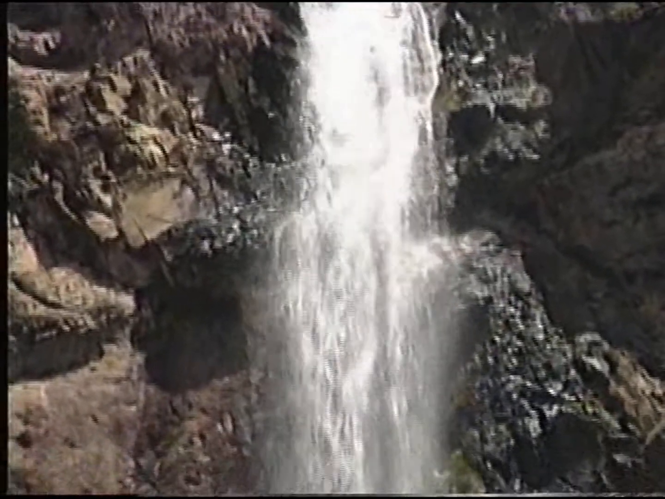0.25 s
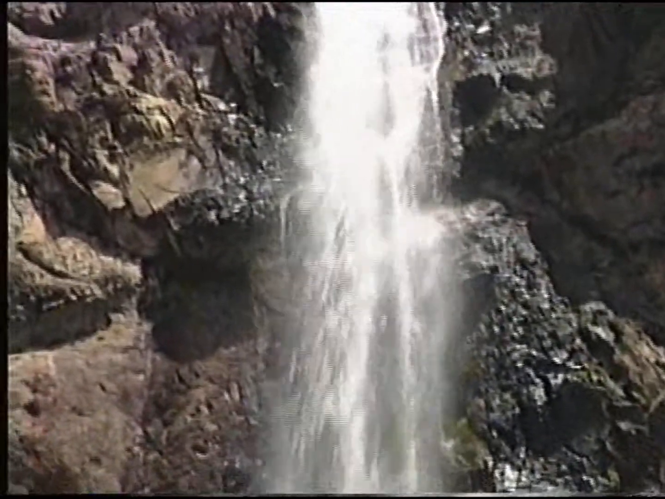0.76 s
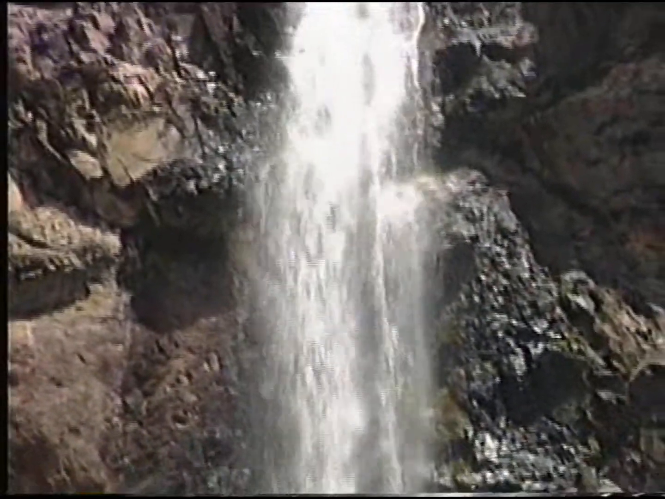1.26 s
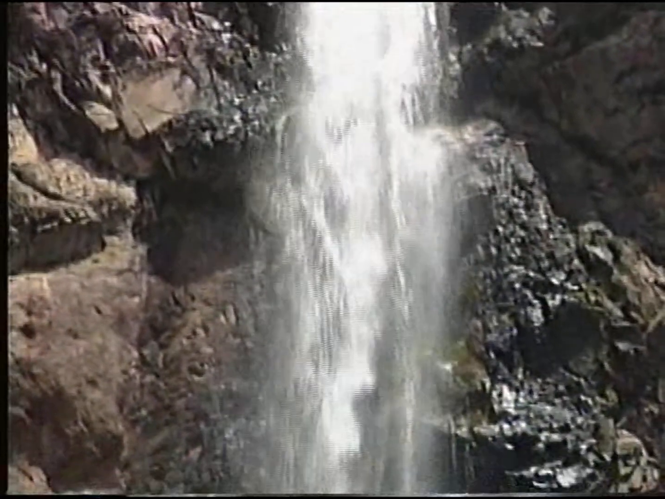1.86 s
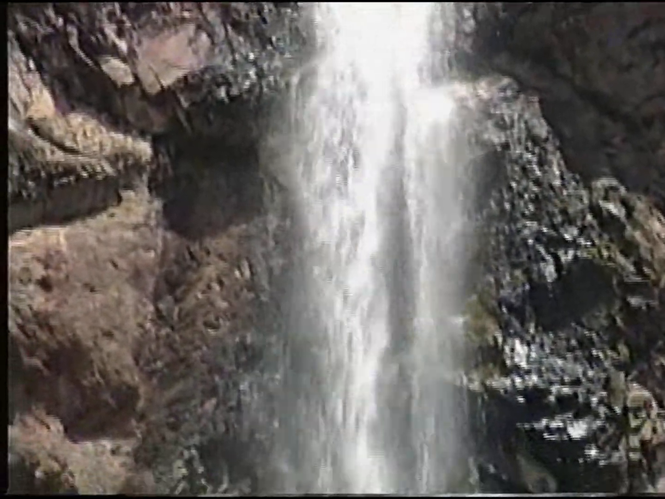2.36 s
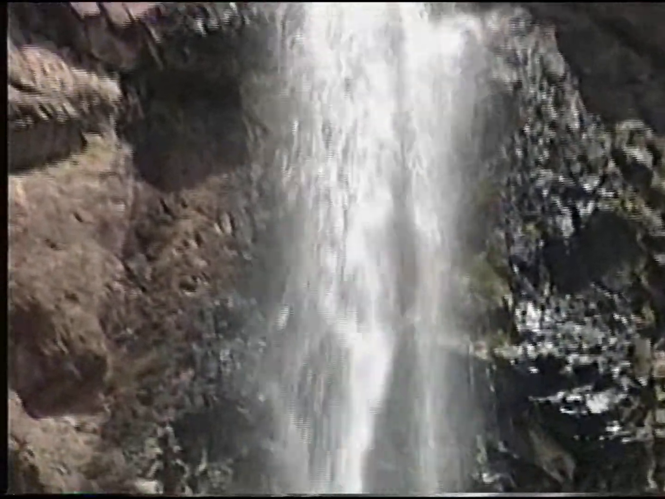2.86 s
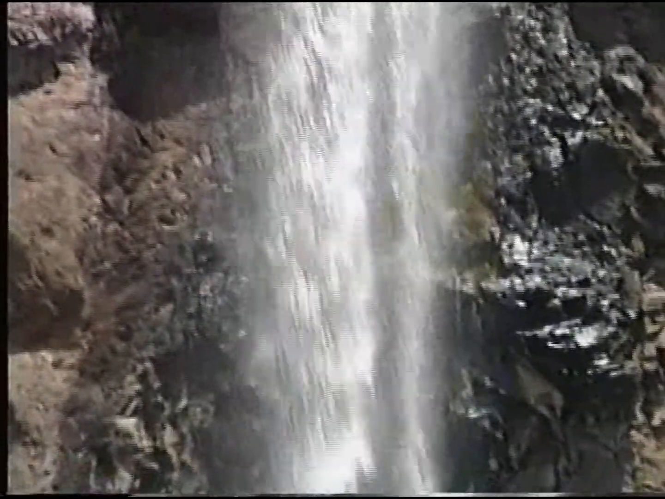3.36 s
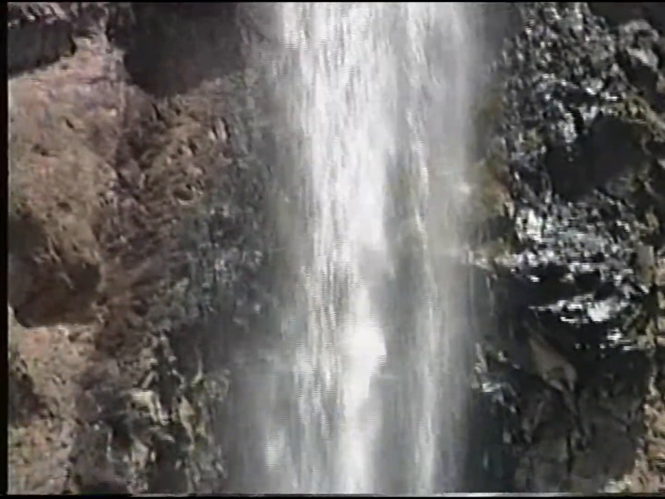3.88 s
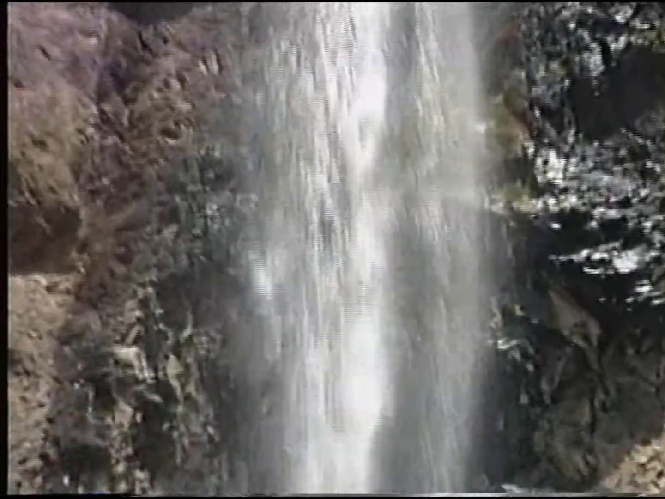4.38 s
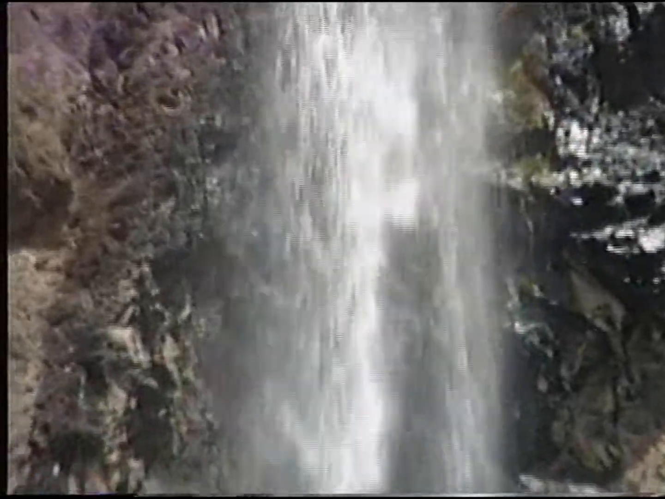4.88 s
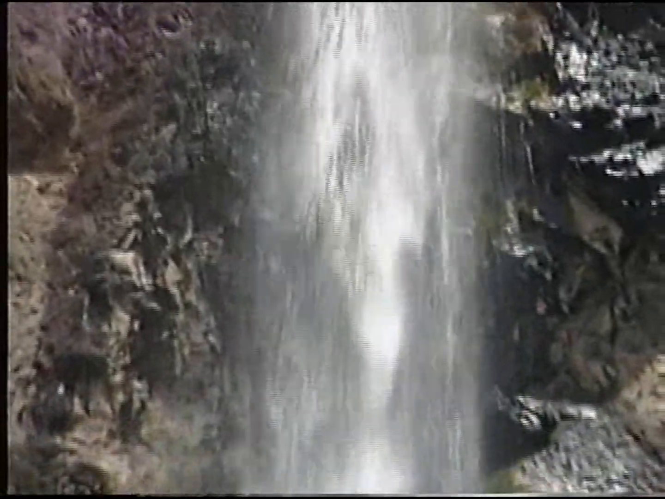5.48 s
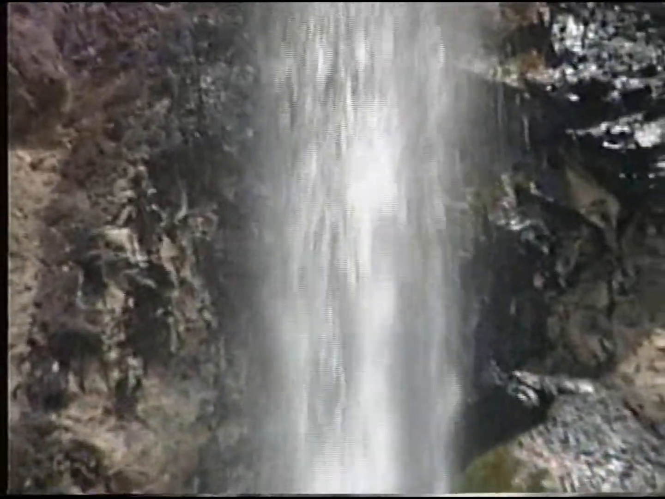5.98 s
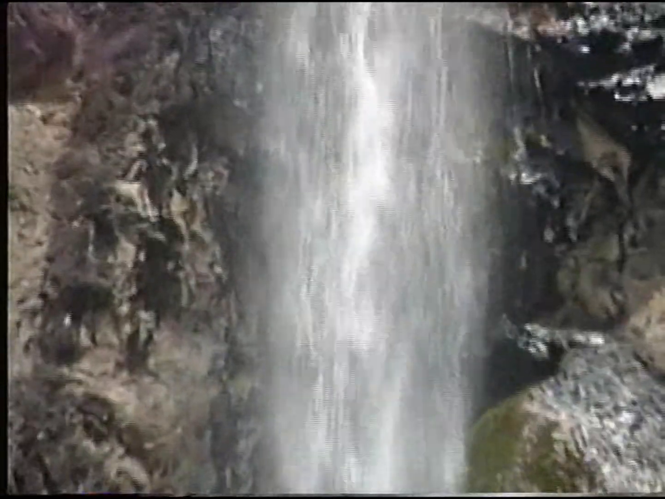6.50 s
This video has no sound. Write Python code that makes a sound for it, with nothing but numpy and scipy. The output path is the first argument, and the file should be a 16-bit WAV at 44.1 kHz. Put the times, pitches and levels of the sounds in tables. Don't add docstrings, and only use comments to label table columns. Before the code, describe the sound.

Continuous waterfall noise outdoors by a mountain rock face: full, churning roar in the low mids, sizzling droplets on stone above it, a little hollow in between. The level stays even from start to finish, with only tiny shifting patches. Mono camcorder sound, slightly grainy and buzzing on top, with a barely audible motor hum and high whine.

```python
import sys
import numpy as np
from scipy import signal
from scipy.fft import rfft, irfft, next_fast_len
from scipy.io import wavfile
from scipy.ndimage import uniform_filter1d, map_coordinates

SR = 44100
rng = np.random.default_rng(int(sys.argv[2]) if len(sys.argv) > 2 else 0)


def to_wav(sig):
    pcm = np.clip(np.atleast_2d(sig), -1, 1) * 32767
    pcm = np.round(pcm).astype(np.int16)
    wavfile.write(sys.argv[1], SR, pcm.T)


def level_to_linear(level):
    exponent = np.asarray(level, float) / 20
    return 10 ** exponent


N = 297234
TIME = np.arange(N) / SR


def unit(x):
    return x / np.sqrt(np.mean(x ** 2) + 1e-20)


def wobble(rate):
    knots = rng.standard_normal(int(N * rate / SR) + 4)
    return map_coordinates(knots, [TIME * rate])


def filtered(x, response):
    size = next_fast_len(N + 8192)
    hz = np.fft.rfftfreq(size, 1 / SR)
    return irfft(rfft(x, size) * response(hz), size)[:N]


def coloured(x, spectrum):
    points_hz, points_db = np.transpose(spectrum)

    def gain(hz):
        return level_to_linear(np.interp(np.log(hz + 1), np.log(points_hz + 1), points_db))

    return unit(filtered(x, gain))


def patchy(patchy_db):
    hiss = signal.stft(rng.standard_normal(N), nperseg=512)[2]
    patches = uniform_filter1d(rng.standard_normal(hiss.shape), size=8, axis=0)
    patches = uniform_filter1d(patches, size=12, axis=1)
    hiss = hiss * level_to_linear(patchy_db * unit(patches))
    return unit(signal.istft(hiss, nperseg=512)[1][:N])


def droplets(spread_db):
    sizes = level_to_linear(spread_db * rng.standard_normal(N))
    return unit(rng.standard_normal(N) * sizes)


def rumble():
    # frequency in Hz, level in dB per Hz.
    rumble_colour = [(2, -3), (15, 7), (35, 1), (60, 0), (120, -33)]
    return level_to_linear(-53.0) * coloured(rng.standard_normal(N), rumble_colour)


def spray():
    # frequency in Hz, level in dB per Hz.
    spray_colour = [(940, -13), (1600, -7.5), (1850, -2), (2200, -0.5), (5300, -5), (6800, -5.5),
                    (8500, -9), (10200, -14), (12000, -22), (13500, -30), (14500, -36), (15400, -48),
                    (16500, -70)]
    hail = unit(patchy(patchy_db=0.27) + level_to_linear(-5.0) * droplets(spread_db=4))
    return level_to_linear(-21) * coloured(hail, spray_colour)


def plunge():
    # frequency in Hz, level in dB per Hz.
    roar_colour = [(35, -45), (60, -25), (120, -9.5), (190, -2.5), (300, 0.5), (520, -3), (800, -4),
                   (1050, -6.5), (1300, -9.5), (1450, -15.5), (1600, -25.5), (2080, -53), (3520, -120)]
    return level_to_linear(-15) * coloured(patchy(patchy_db=0.34), roar_colour)


def scene():
    return (rumble() + spray() + plunge())[None]


def drum_hum():
    hum_hz = 44.96
    return level_to_linear(-49.0 + 2 * wobble(1.2)) * np.sin(2 * np.pi * hum_hz * TIME)


def line_whistle():
    whistle_hz = 15738
    return level_to_linear(-64.5 + 1.5 * wobble(9)) * np.sin(2 * np.pi * whistle_hz * TIME)


def head_flutter(sound):
    flutter_hz = 82.02
    buzz = np.cos(2 * np.pi * flutter_hz * TIME - 0.3)
    loose_contact = 0.32 * wobble(10) + 0.35 * wobble(40)
    short_waves = filtered(sound, lambda hz: 0.11 * (hz / 12000) ** 1.7)
    return (buzz + loose_contact) * short_waves


def low_pass(x):
    return signal.sosfilt(signal.butter(12, 15800, fs=SR, output="sos"), x)


def record(dry):
    sound = dry[0]
    offset = 0.1012
    tape = sound + head_flutter(sound) + drum_hum() + line_whistle() + offset
    return low_pass(tape[None])


dry = scene()
out = record(dry)
to_wav(out)
```